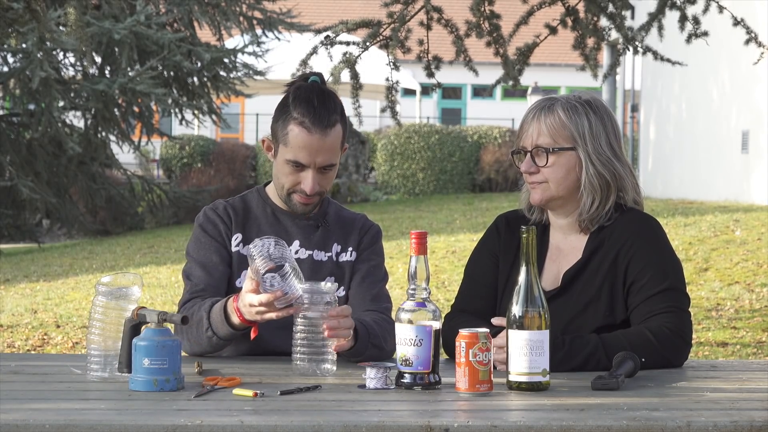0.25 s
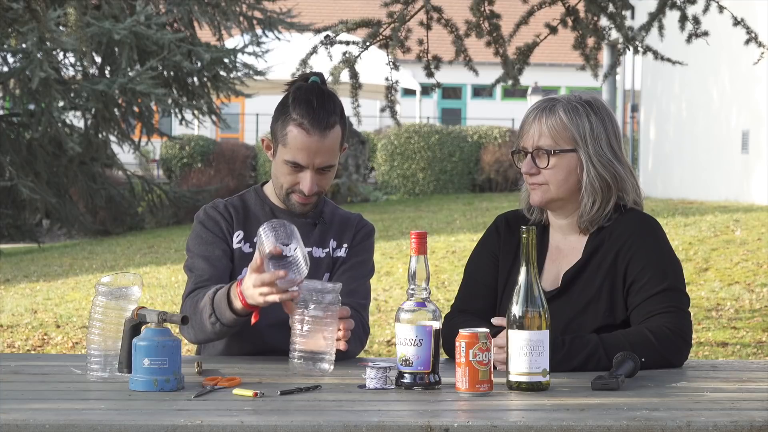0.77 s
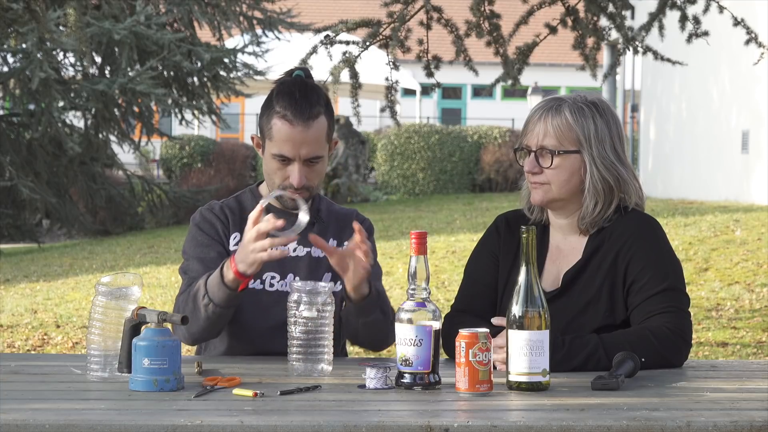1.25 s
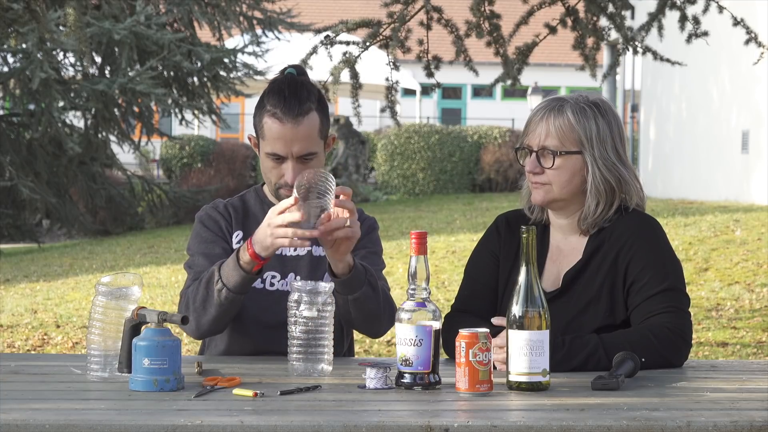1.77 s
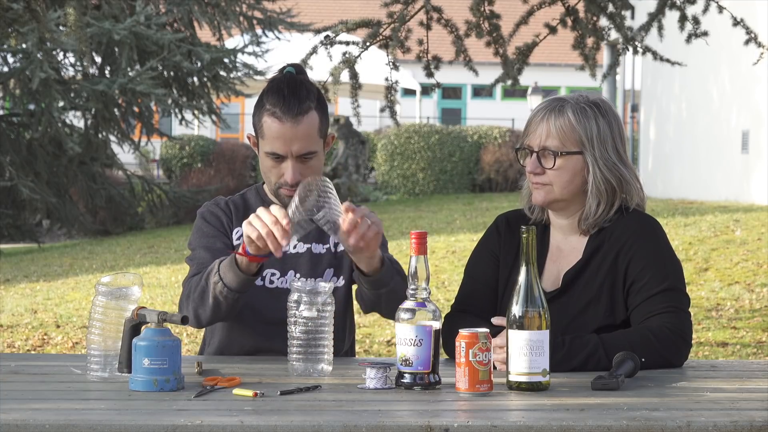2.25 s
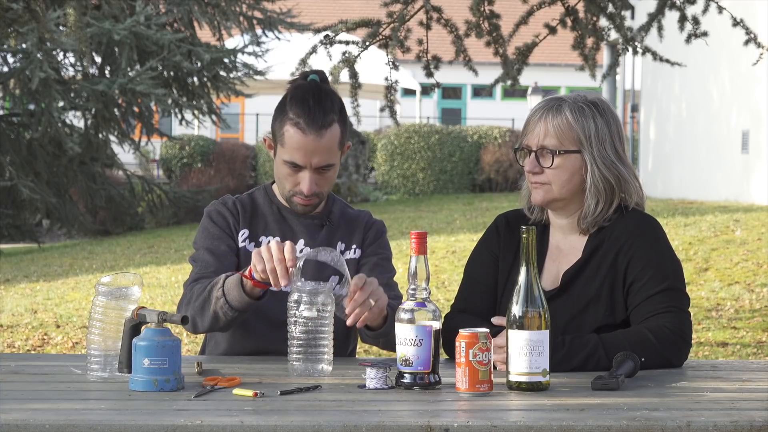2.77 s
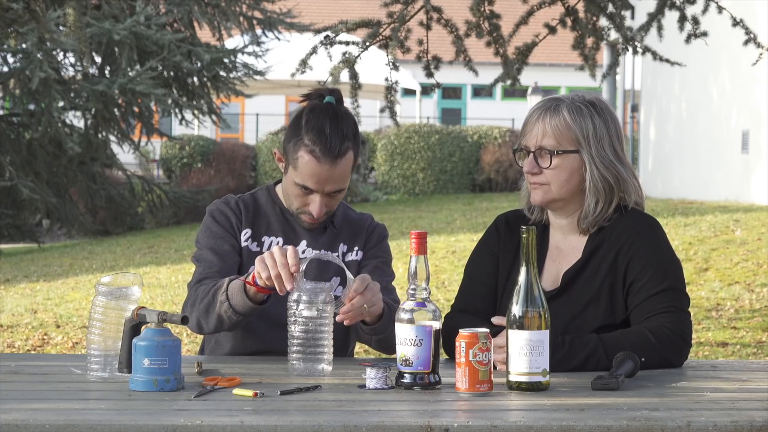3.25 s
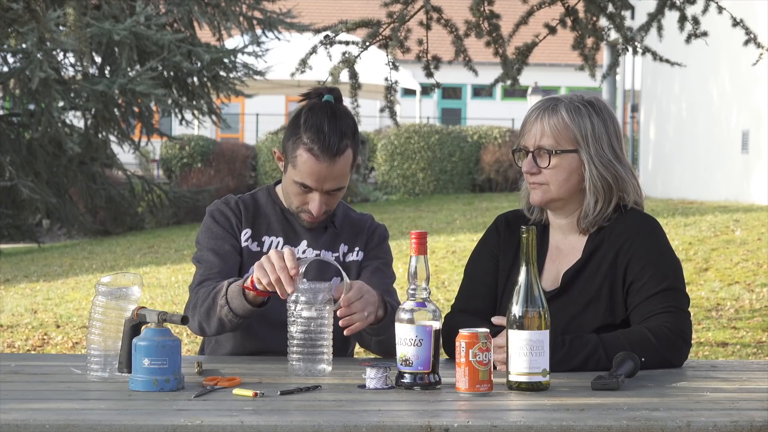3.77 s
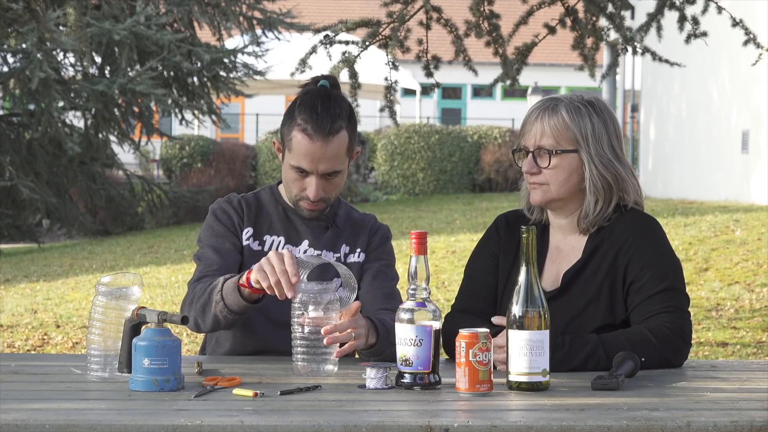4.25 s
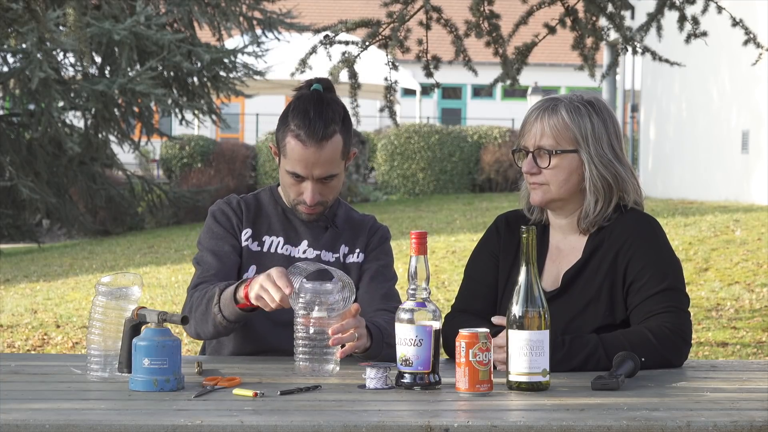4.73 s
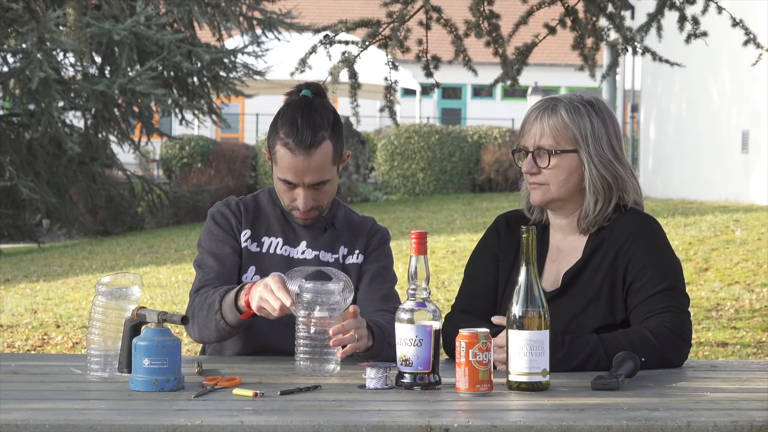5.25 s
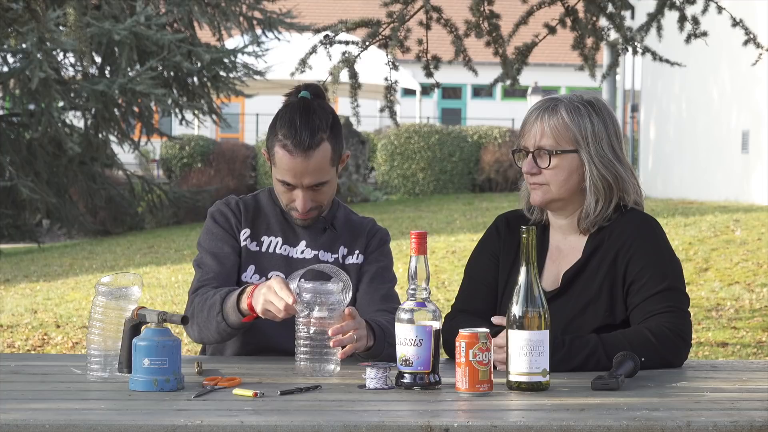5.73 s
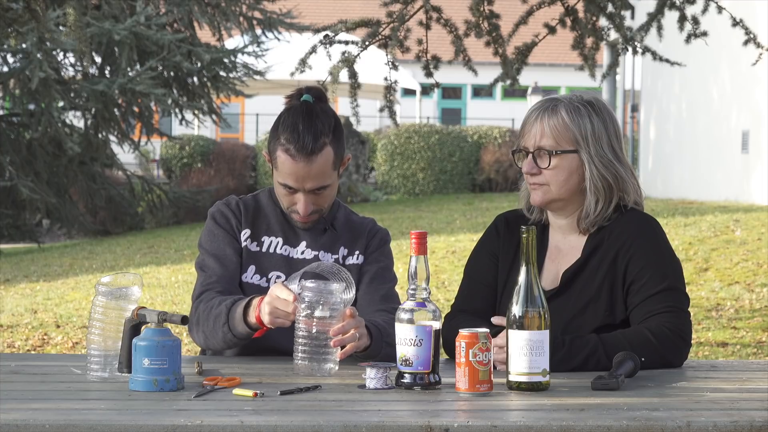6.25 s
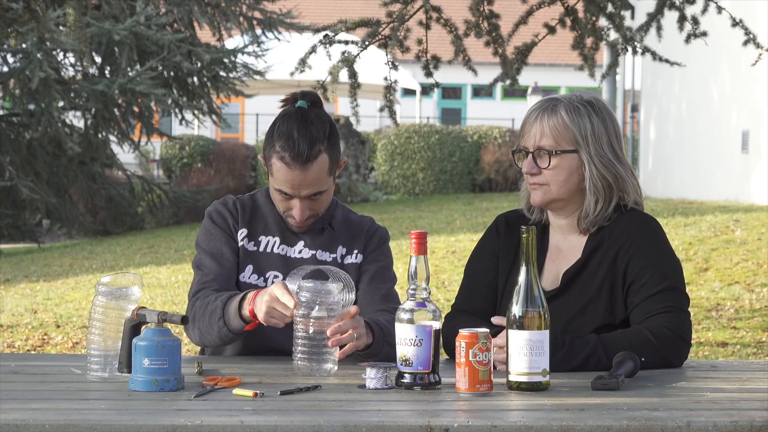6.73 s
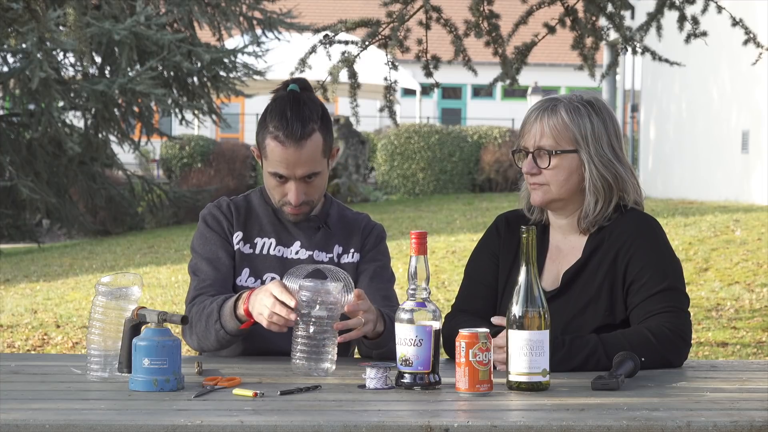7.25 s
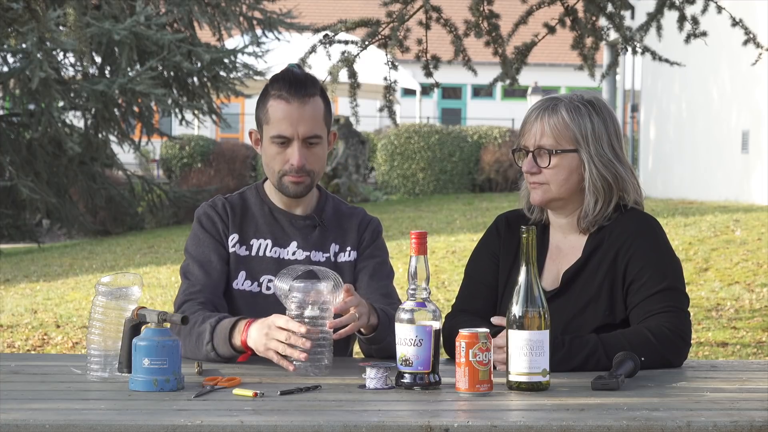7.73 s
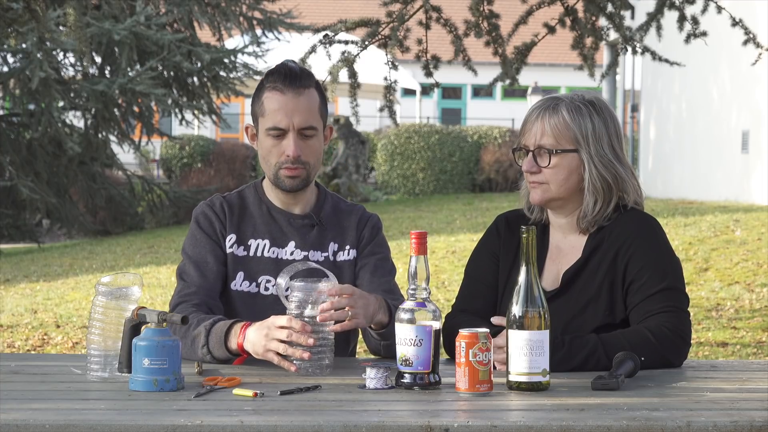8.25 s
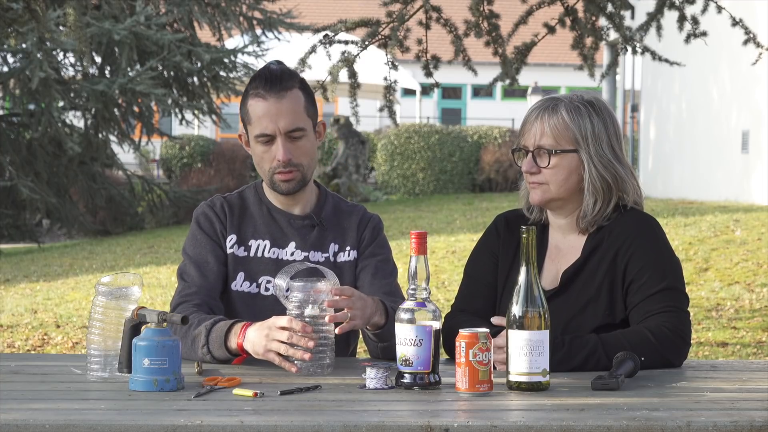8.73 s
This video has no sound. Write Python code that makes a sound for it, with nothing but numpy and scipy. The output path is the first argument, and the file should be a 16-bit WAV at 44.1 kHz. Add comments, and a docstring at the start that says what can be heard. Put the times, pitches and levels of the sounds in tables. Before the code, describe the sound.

Outdoors, a faint wavering low hum and soft, dark open air run throughout, with a very quiet distant engine-like drone rising and sinking in the first six seconds. Close up, thin plastic scrapes and ticks lightly from 0 to 1 s. After a lull, a few thin crackles come at 1.6-2.4 s, with tiny far bird chirps between 1.3 and 2.7 s. From 3 s the buckling thickens: a cluster at 3.4-3.9 s has hollow snaps and a dull small table thud near 3.6 s. Crackling continues from 4.2 s, with sharp, loud pops around 5.1, 5.7, 6.1 and 6.5-6.6 s, short scrapes and gritty edge hiss between them. After 6.9 s it thins to softer clicks, finger scuffs and brief hollow croaks until 7.8 s, with distant chirps at 7.5-8.4 s. Sparse plastic ticks finish, one firmer pop near 8.7 s. Dry, close, scarcely any echo.

```python
"""A faint low hum and the murmur of open air come first, with plastic edges scraping close by.
The cut-off neck of a thin plastic bottle is handled and pressed into the bottle's body, at a table outdoors.
Stick-slip friction makes the scrapes and croaks; buckling strikes the shell's modes in sharp snaps and ticks.
Small birds, gliding sine tones, call far off; reflections and a diffuse tail place the sounds outdoors."""
import sys
import numpy as np
from scipy import signal
from scipy.fft import rfft, irfft, next_fast_len
from scipy.io import wavfile

SR = 44100
rng = np.random.default_rng(int(sys.argv[2]) if len(sys.argv) > 2 else 0)


def bounce(signal):
    """Save signal as a 16-bit WAV file at the path given by the first command-line argument."""
    frames = np.transpose(np.atleast_2d(signal))
    limited = np.clip(frames, -1, 1)
    pcm = np.round(limited * 32767).astype(np.int16)
    wavfile.write(sys.argv[1], SR, pcm)


N = 396459  # length in samples


def from_db(db):
    """Level law: decibels to an amplitude ratio."""
    return 10 ** (np.asarray(db) / 20)


def rms_one(x):
    """Normalisation: scale to unit mean power."""
    return x / np.sqrt(np.mean(x ** 2) + 1e-20)


def in_time(rows):
    """Linear interpolation: each column of a time table at every sample."""
    s, *columns = np.transpose(rows)
    return [np.interp(np.arange(N) / SR, s, column) for column in columns]


def at_hz(points, hz):
    """Logarithmic frequency scale: interpolate a spectral table along it."""
    f, value = np.transpose(points)
    return np.interp(np.log(np.maximum(hz, 1)), np.log(f), value)


def coloured(x, spectrum):
    """Spectral shaping: weight the Fourier components of a noise; unit power."""
    size = next_fast_len(N)
    hz = np.arange(size // 2 + 1) * SR / size
    shaped = irfft(rfft(x, size) * from_db(at_hz(spectrum, hz)), size)
    return rms_one(shaped[:N])


def drift(rate):
    """Random modulation: normal values at a rate per second, joined by straight lines."""
    knots = rng.standard_normal(4000)
    return np.interp(np.arange(N) / SR * rate, np.arange(len(knots)), knots)


def resonate(x, hz, width_hz):
    """Simple resonator: a pole pair, with unit gain at the peak."""
    r = np.exp(-np.pi * width_hz / SR)
    poles = [1, -2 * r * np.cos(2 * np.pi * hz / SR), r * r]
    return signal.lfilter(np.array([1, 0, -1]) * (1 - r * r) / 2, poles, x)


def through(x, resonances):
    """Modal superposition: parallel resonances of alternating sign; unit power."""
    modes = [from_db(db) * resonate(x, hz, width) for hz, width, db in resonances]
    return rms_one(sum((-1) ** k * mode for k, mode in enumerate(modes)))


def add(out, s, sound):
    """Linear superposition: mix a short sound in at time s."""
    i = int(np.clip(round(s * SR), 0, len(out) - 1))
    out[i:i + len(sound)] += sound[:len(out) - i]


# decay of the thin shell: f/Hz, time to fall by 60 dB t/s (a mode may scale it)
SHELL_DECAY = [(200, 0.065), (500, 0.036), (1100, 0.029), (2500, 0.017), (6000, 0.013), (15000, 0.016)]


def ringing(hz, t, longer=1):
    """Damped free vibration: one decaying sine of the shell for each frequency."""
    hz = np.atleast_1d(hz)[:, None]
    return np.sin(2 * np.pi * hz * t) * from_db(-60 * t / (longer * at_hz(SHELL_DECAY, hz)))


STROKE_ATTACK_S, STROKE_SAG_DB_PER_S, STROKE_RELEASE_S = 0.0078, 4.5, 0.011


def stroke(start, length, sag_db_per_s):
    """Amplitude envelope: a movement catches, eases off and lets go; unit gain at mid-length."""
    t = np.maximum(np.arange(N) / SR - start, 0)
    t = t[t < length + .3]
    shape = np.minimum(t / STROKE_ATTACK_S, 1) * np.exp(-np.maximum(t - length, 0) / STROKE_RELEASE_S)
    return np.pad(shape * from_db(-sag_db_per_s * (t - length / 2)), (0, N - len(t)))


# steady hum before its waver: t/s, fundamental amplitude level/dB, octave amplitude level/dB
HUM_LEVELS = [(0, -49, -66), (2.6, -57.5, -63), (4.8, -59.5, -72.5), (5.6, -56, -71), (6.8, -59, -66),
              (7.6, -54.5, -63), (8.6, -49, -65.5), (9, -56, -69)]
HUM_HZ = 66.4
# distant engine before its waver: t/s, f/Hz, amplitude level/dB
ENGINE_COURSE = [(0, 64.6, -68), (1.3, 70, -52), (2.1, 80, -58), (2.6, 68, -49), (3.1, 50, -51.5),
                 (4.2, 50, -65.5), (5.2, 51, -55.5), (5.8, 37, -71)]
# faint whine of the first seconds; its level is that at mid-length
WHINE_HZ, WHINE_DB, WHINE_S = 557, -74, 3


def hum(waver_db=2.1, wander_hz=0.43):
    """Periodic and narrow-band sources: hum with octave, an engine that rises then sinks, a noise whine."""
    low_db, octave_db = in_time(HUM_LEVELS)
    engine_hz, engine_db = in_time(ENGINE_COURSE)
    turn = 2 * np.pi * np.cumsum(HUM_HZ + wander_hz * drift(1.1)) / SR
    steady = from_db(low_db) * np.sin(turn) + from_db(octave_db) * np.sin(2 * turn)
    engine = from_db(engine_db) * np.sin(2 * np.pi * np.cumsum(engine_hz) / SR)
    narrow = resonate(resonate(rng.standard_normal(N), WHINE_HZ, 27), WHINE_HZ, 27)
    whine = from_db(WHINE_DB) * stroke(0, WHINE_S, 1) * rms_one(narrow)
    return whine + (steady + engine) * from_db(waver_db * drift(9.5))


# spectrum of the open air: f/Hz, relative level per Hz/dB
AIR_SPECTRUM = [(20, -9.5), (45, -11), (75, -11), (105, -15), (200, -18.5), (370, -27), (540, -23.5),
                (720, -28.5), (1100, -29.5), (2000, -40.5), (4000, -48.5), (16000, -55)]
AIR_DB = -56.5


def open_air():
    """Stationary broadband noise: the murmur of the open air, mostly low-pitched."""
    return from_db(AIR_DB) * coloured(rng.standard_normal(N), AIR_SPECTRUM)


# plastic sliding on plastic and under fingers:
# start t/s, length t/s, scrape level at mid-length/dB, cut-edge hiss over the scrape level/dB
SLIDING_STROKES = [(0.007, 0.069, -51, -14.5), (0.166, 0.087, -53.5, -14.5), (.3, 0.089, -60.5, -14),
                   (0.44, .3, -56.5, -12), (.77, 0.15, -57.5, -26.5), (0.941, 0.19, -62.5, -23.5),
                   (1.556, .035, -55, -6), (1.679, 0.06, -56, -7), (1.821, 0.1, -57.5, -4),
                   (1.925, 0.18, -65.5, -6), (2.137, 0.17, -62.5, -5), (2.938, .21, -55.5, -11.5),
                   (3.574, 0.1, -53, -17), (3.696, 0.025, -46.5, -14.5), (4.161, 0.066, -53, -14.5),
                   (4.274, 0.074, -53.5, -15), (4.37, 0.38, -59, -18), (4.663, 0.044, -51.5, -13),
                   (5.356, 0.084, -55, -10.5), (6.019, 0.05, -52.5, -16), (6.067, 0.025, -46, -13),
                   (6.278, 0.04, -43.5, -15.5), (6.383, 0.018, -45, -16.5), (6.507, 0.14, -49.5, -10),
                   (6.769, 0.061, -51.5, -12.5), (7.35, 0.034, -47.5, -16.5), (7.612, 0.062, -56.5, -7.5),
                   (7.769, 0.056, -49, -7), (8.079, 0.072, -51.5, -11), (8.828, 0.072, -52.5, -10)]
# friction builds up before each snap, as the neck slides deeper, and dies after it
SLIDE_BUILD_S, SLIDE_DIE_S = 0.0099, 0.017
SLIDE_DB, SLIDE_EDGE_DB = -26.5, -11.5  # scrape against the snap's wall level; hiss against the scrape
SLIDE_LEAD_DB = -7  # build-up against the slide after the snap
# fingers that merely hold the bottle: scrape; hiss against the scrape
HOLD_DB, HOLD_EDGE_DB = -69.5, -11.5


def sliding():
    """Incoherent addition: powers of strokes, slides and hold add; returns scrape dB, hiss over it dB."""
    def fade(x, s):
        # s is the time constant of amplitude, so power fades twice as fast
        return signal.lfilter([1], [1, -np.exp(-2 / (s * SR))], x + 1e-18)

    jolts = np.zeros(N)
    for s, _, wall_db, *_ in BUCKLING_SNAPS:
        add(jolts, s, from_db([wall_db + SLIDE_DB]) ** 2)
    lead = fade(jolts[::-1], SLIDE_BUILD_S)[::-1]
    slide = fade(jolts, SLIDE_DIE_S) + from_db(SLIDE_LEAD_DB) ** 2 * lead
    scrape = slide + from_db(HOLD_DB) ** 2
    hiss = slide * from_db(SLIDE_EDGE_DB) ** 2 + from_db(HOLD_DB + HOLD_EDGE_DB) ** 2
    for start, length, scrape_db, edge_db in SLIDING_STROKES:
        power = (from_db(scrape_db) * stroke(start, length, STROKE_SAG_DB_PER_S)) ** 2
        scrape = scrape + power
        hiss = hiss + power * from_db(edge_db) ** 2
    return 10 * np.log10(scrape), 10 * np.log10(hiss / scrape)


# resonances of the held bottle under a scrape: f/Hz, width f/Hz, relative level/dB
HELD_BOTTLE = [(384, 450, 5), (463, 100, 14), (755, 180, 3.5), (1130, 340, 4), (1610, 340, -2),
               (2530, 420, -8.5)]
# hiss of sliding: f/Hz, relative level per Hz/dB
SLIDING_HISS = [(2000, -16), (3200, 2), (4600, 2), (6200, -3.5), (8500, -9), (12000, -3.5), (16000, -13)]


def rubbing(slips_per_s=330, size_db=4.0, smooth=1.0, uneven_db=4.5):
    """Stick-slip friction: tiny slips over a smooth noise excite the bottle and hiss at the cut edge."""
    scrape, edge = sliding()
    sizes = from_db(size_db * np.minimum(rng.exponential(1, N), 3.5))
    slips = (rng.random(N) < slips_per_s / SR) * sizes
    bursts = signal.lfilter([1], [1, -np.exp(-1200 / SR)], slips + 1e-18)
    # the more the sharp edge catches, the grainier the friction
    gliding = smooth * from_db(np.mean(edge) - edge)
    force = (rms_one(bursts) + gliding) / np.hypot(1, gliding)
    friction = force * rng.standard_normal(N) * from_db(uneven_db * drift(45))
    body = from_db(scrape) * through(friction, HELD_BOTTLE)
    return body + from_db(scrape + edge) * coloured(friction, SLIDING_HISS)


# colour of the thin shell: f/Hz, relative level per Hz/dB
SHELL_COLOUR = [(120, -20), (362, -5), (493, 2), (773, -5), (1120, -6), (1290, -11), (1750, -8), (2340, -7),
                (3050, -13.5), (4880, -12), (11100, -20), (12300, -17.5), (16000, -26.5)]


def tick(db, brightness_db=0, count=90):
    """Impulsive modal excitation: a tiny crease strikes shell modes, tilted by brightness in dB per octave."""
    t = np.arange(int(.025 * SR)) / SR
    hz = np.linspace(np.sqrt(400), np.sqrt(15500), count) ** 2 * rng.uniform(.96, 1.04, count)
    colour = from_db(at_hz(SHELL_COLOUR, hz) + brightness_db * np.log2(hz)) * hz ** (1 / 3)
    ring = (rng.choice([-1, 1], count) * colour) @ ringing(hz, t)
    # the level is the energy spread over five milliseconds
    return np.sqrt(.005 / t[-1]) * from_db(db) * rms_one(ring)


# peak rate; median level over the edge's hiss; spread of level
TICKS_PER_S, TICK_DB, TICK_SPREAD_DB = 220, 0.5, 7


def ticks(fussy=2.3):
    """Random point process: fine crackles crowd in where the cut edge catches hardest."""
    scrape, edge = sliding()
    out = np.zeros(N)
    rate = TICKS_PER_S * from_db(fussy * (edge - edge.max()))
    for i in np.flatnonzero(rng.random(N) < rate / SR):
        spread = TICK_SPREAD_DB * rng.standard_normal()
        add(out, i / SR, tick(scrape[i] + edge[i] + TICK_DB + spread))
    return out


def crease(run_s, follow=0.38, settle_db=-28, settle_s=0.0061, tearing_s=0.0065, count=5):
    """Progressive buckling: a first slip, weaker in a slow fold, then lesser ones; delays s, sizes."""
    running = 2 * run_s * (np.arange(count) + rng.random(count)) / count
    settling = run_s + rng.exponential(settle_s, count)
    sizes = np.repeat([follow, from_db(settle_db)], count) * rng.rayleigh(np.sqrt(.5), 2 * count)
    return np.r_[0, running, settling], np.r_[np.exp(-run_s / tearing_s), sizes]


# buckling wall: t/s, body (180-800 Hz) level/dB, wall (800-3000 Hz) level/dB, crack (above 3000 Hz) level/dB,
# popping panel f/Hz, mean delay of the running slips t/s; snaps() trims the levels and cuts the bass
BUCKLING_SNAPS = [(0.061, -36.5, -51.5, -57.5, 444, 0.0087), (0.1726, -45, -45, -50, 490, 0.00067),
                  (0.3579, -39, -61, -51, 574, 0.00045), (0.3734, -32, -32.5, -35.5, 605, 0.00025),
                  (0.5131, -40, -35, -34.5, 12600, 0.00058), (0.6604, -46, -41, -52, 900, 0.00017),
                  (0.765, -38, -50.5, -71, 730, 0.00032), (0.8842, -38.5, -36, -42, 814, 0.0012),
                  (0.9444, -34, -54, -83, 470, 0.002), (0.996, -37.5, -62, -81, 470, 0.0026),
                  (1.7029, -67, -41, -42.5, 1030, 0.0035), (1.784, -44, -34, -35.5, 960, 0.0047),
                  (1.8841, -65, -33, -39.5, 1066, 0.00099), (2.297, -57, -42.5, -45.5, 1230, 0.0019),
                  (2.3389, -39.5, -36.5, -34.5, 3404, 0.00054), (3.0155, -47, -45, -55, 928, 0.00071),
                  (3.0508, -36, -35, -43, 540, 0.0012), (3.2935, -43, -38, -55, 810, 0.0028),
                  (3.421, -30.5, -35, -39.5, 636, 0.0024), (3.4795, -30, -26, -34, 1100, 0.00077),
                  (3.4882, -29.5, -37.5, -47, 477, 0.0032), (3.5073, -32.5, -30, -44.5, 834, 0.00042),
                  (3.5817, -24, -24.5, -26, 674, 0.0005), (3.8049, -40.5, -34, -41, 2905, 0.00023),
                  (3.889, -22, -22, -30, 922, 0.0022), (4.208, -44.5, -46.5, -51, 897, 0.00093),
                  (4.2529, -56, -43.5, -55, 827, 0.0006), (4.3117, -35.5, -44.5, -61, 610, 0.0044),
                  (4.3316, -38, -52.5, -65, 410, 0.0017), (4.438, -32.5, -41, -58, 463, 0.0018),
                  (4.5554, -39, -35.5, -45.5, 1083, 0.00052), (4.628, -38.5, -33, -40, 847, 0.0012),
                  (4.6856, -43, -40, -48, 1070, 0.0013), (4.7042, -39.5, -28.5, -43, 478, 0.0015),
                  (4.719, -36.5, -23.5, -27.5, 2530, 0.00051), (4.7342, -35, -30, -31.5, 1170, 0.00062),
                  (4.862, -30.5, -27, -34, 797, 0.00052), (4.8796, -28.5, -23, -31, 1095, 0.0011),
                  (5.0628, -35.5, -44.5, -54, 535, 0.0031), (5.0742, -30.5, -32, -39.5, 570, 0.00084),
                  (5.077, -43, -28.5, -28, 1323, 0.00077), (5.0969, -22, -15, -18.5, 1610, 0.001),
                  (5.1161, -29.5, -35, -46, 523, 0.0034), (5.3962, -34, -33, -44.5, 1130, 0.0056),
                  (5.4207, -45, -35, -36, 2190, 0.00031), (5.491, -45, -37, -41.5, 2170, 0.0011),
                  (5.658, -44.5, -43, -56.5, 920, 0.00049), (5.6739, -46, -38.5, -50, 897, 0.0034),
                  (5.6887, -27, -18.5, -24.5, 2080, 0.00054), (5.702, -28, -15.5, -24.5, 1740, 0.00011),
                  (5.739, -35.5, -34.5, -40.5, 743, 0.0038), (5.7654, -38, -36.5, -44, 2100, 0.00069),
                  (6.0997, -33.5, -12, -23, 1130, 0.00095), (6.1326, -34, -28, -33.5, 1090, 0.00012),
                  (6.147, -31.5, -38.5, -58, 630, 0.0011), (6.2474, -40, -44.5, -45.5, 535, 0.00086),
                  (6.2785, -36, -46, -52.5, 700, 0.0025), (6.361, -46, -44, -42.5, 610, 0.00093),
                  (6.4108, -36, -42.5, -57.5, 665, 0.0017), (6.4599, -36, -38.5, -42.5, 1070, 0.0013),
                  (6.497, -28.5, -20, -19, 1130, 0.0002), (6.5338, -36, -40, -53, 1170, 0.002),
                  (6.563, -32.5, -34, -49, 1150, 0.0017), (6.5735, -36.5, -36.5, -50, 1150, 0.0018),
                  (6.589, -25, -16.5, -21.5, 1810, 0.0016), (6.6105, -40.5, -37.5, -50, 1200, 0.0044),
                  (6.7347, -40, -39.5, -57.5, 1150, 0.00021), (6.7865, -33.5, -34.5, -35.5, 470, 0.00055),
                  (6.8885, -32, -24, -39, 1945, 0.00054), (6.9564, -47, -37.5, -43.5, 1120, 0.00095),
                  (7.151, -47, -53.5, -61.5, 372, 0.00077), (7.3528, -51, -43, -39.5, 2010, 0.00063),
                  (7.3608, -37.5, -40, -41, 1100, 0.00074), (7.3694, -41, -39.5, -43, 470, 0.00017),
                  (7.4206, -39, -39.5, -45.5, 530, 0.0012), (7.429, -36.5, -42.5, -42, 585, 0.0018),
                  (7.841, -46, -42.5, -43, 1070, 0.00025), (8.096, -43.5, -40, -38.5, 4400, 0.0035),
                  (8.138, -60, -39.5, -42.5, 1464, 0.0023), (8.2212, -30, -39, -42, 510, 0.0027),
                  (8.695, -25, -29, -30.5, 667, 0.00039), (8.833, -44, -46, -34, 5500, 0.00077),
                  (8.8588, -44, -47.5, -45, 592, 0.0019), (8.93, -41.5, -58, -69, 397, 0.0012)]


def snaps(panel_db=-2.5, panel_rings=0.82, wall_db=-1.0, crack_db=-1.0, rise_cycles=0.16,
          lowest_hz=165, softer_db=1.0, count=360):
    """Snap-through buckling: every slip strikes dense shell modes anew, and the popping panel rings out."""
    t = np.arange(int(.07 * SR)) / SR
    hz = np.linspace(np.sqrt(130), np.sqrt(16500), count) ** 2
    edges = [800, 3000]  # Hz, between body, wall and crack

    def swell(f):
        # bending waves travel slower at low pitch, so low modes swell later than the crack
        return 1 - np.exp(-t * f / rise_cycles)

    # the fourth root makes up for modes spaced wider at high pitch
    strengths = from_db(at_hz(SHELL_COLOUR, hz)) * hz ** (1 / 4)
    modes = ringing(hz, t) * swell(hz[:, None]) * strengths[:, None]
    families = np.split(modes, np.searchsorted(hz, edges))
    # a snap's level is its energy spread over five milliseconds
    brief = np.sqrt(.005 / t[-1])
    out = np.zeros(N)
    for s, body, wall, crack, panel_hz, run_s in BUCKLING_SNAPS:
        delays, sizes = crease(run_s)
        for k, level_db in enumerate((body, wall + wall_db, crack + crack_db)):
            strikes = rng.standard_normal((len(sizes), len(families[k]))) @ families[k]
            ring = np.zeros(len(t))
            # the later slips are softer, and so duller than the first
            dulled = sizes * from_db(-softer_db * k * (delays > 0))
            for delay, size, strike in zip(delays, dulled, strikes):
                add(ring, delay, size * rms_one(strike))
            if k == np.digitize(panel_hz, edges):
                panel = rms_one(ringing(panel_hz, t, panel_rings)[0] * swell(panel_hz))
                # the panel moves with the shell around it, never against it
                ring = rms_one(ring) + np.copysign(from_db(panel_db), ring @ panel) * panel
            add(out, s, brief * from_db(level_db) * rms_one(ring))
    # so small a wall radiates little bass
    return signal.sosfilt(signal.butter(2, lowest_hz, "high", fs=SR, output="sos"), out)


# light strokes on the wall, the loose neck or the cut edge:
# start t/s, length t/s, resonance f/Hz, width f/Hz, median level/dB
SINGING_STROKES = [(0.15, 0.71, 2120, 700, -71), (0.38, 0.11, 11700, 3000, -64.5),
                   (1.716, 0.61, 1095, 220, -62), (1.878, 0.084, 12300, 4000, -60)]


def singing(uneven_db=6.5):
    """Friction-driven resonance: uneven rubbing noise keeps a single resonance going."""
    out = np.zeros(N)
    for start, length, hz, width, db in SINGING_STROKES:
        tone = rms_one(resonate(rng.standard_normal(N), hz, width))
        out += from_db(db + uneven_db * drift(45)) * stroke(start, length, 0) * tone
    return out


# single creases too light to pop a panel: t/s, level/dB, brightness/dB per octave
LIGHT_CREASES = [(0.237, -45.5, -1.5), (0.301, -42, 4), (0.4665, -38.5, 1.5), (0.478, -39, 2.5),
                 (.5, -43, 16), (.874, -43, -6), (1.454, -47, 2), (1.583, -52, 4.5), (2.0907, -44, 13),
                 (2.167, -53.5, 0.5), (2.248, -51.5, 2.5), (3.127, -42.5, 0), (3.2855, -44.5, -1.5),
                 (3.66, -53, 1), (4.266, -43.5, -3.5), (4.748, -41.5, -2.5), (4.961, -52, 0.5),
                 (5.147, -41.5, -2.5), (6.396, -41, -3.5), (6.928, -51, 0), (8.151, -42, -0.5),
                 (8.244, -42, -3.5), (8.506, -48.5, 3.5), (8.6388, -43.5, 0), (8.667, -45, -1),
                 (8.735, -46, 9), (8.745, -47.5, 5)]


def crinkles():
    """Stress relaxation: the strained wall gives way in separate light ticks."""
    out = np.zeros(N)
    for s, db, brightness_db in LIGHT_CREASES:
        add(out, s, tick(db, brightness_db))
    return out


# bird notes: start t/s, length t/s, first f/Hz, middle f/Hz, last f/Hz, level at mid-note/dB
BIRD_NOTES = [(1.351, 0.09, 4760, 4210, 4300, -64.5), (1.502, 0.033, 5340, 5200, 5340, -67.5),
              (1.647, 0.041, 7160, 7360, 7100, -64.5), (1.766, 0.06, 3730, 4110, 4200, -62),
              (2.507, 0.095, 6200, 7920, 6500, -67.5), (2.67, 0.038, 5800, 7030, 7160, -68.5),
              (2.704, 0.033, 7100, 7400, 6260, -62.5), (7.519, 0.06, 7400, 7400, 7300, -71),
              (7.645, 0.054, 3950, 4210, 4090, -53), (7.91, 0.031, 8250, 7520, 7640, -70.5),
              (8.034, 0.055, 4360, 4110, 4100, -54.5), (8.168, 0.11, 5150, 5230, 5050, -70),
              (8.338, 0.048, 8400, 7180, 7000, -64.5)]


def birds(waver=0.0046):
    """Frequency modulation: whistles slide quickly onto their middle pitch, hold it and slide off."""
    out = np.zeros(N)
    wobble = 1 + waver * drift(220)
    for s, length, first_hz, middle_hz, last_hz, db in BIRD_NOTES:
        u = np.linspace(-1, 1, int(length * SR))
        end_hz = np.where(u < 0, first_hz, last_hz)
        hz = middle_hz + (end_hz - middle_hz) * np.abs(u) ** 4
        phase = 2 * np.pi * np.cumsum(hz * wobble[int(s * SR):][:len(u)]) / SR
        add(out, s, from_db(db) * np.sqrt(2 * (1 - u * u)) * np.sin(phase))
    return out


# the foot of the bottle bumps the table; the level is the starting amplitude
BUMP_S, BUMP_HZ, BUMP_DB = 3.582, 153, -32.5


def bump():
    """Damped impact response: a dull, short thud of the table top."""
    out = np.zeros(N)
    add(out, BUMP_S, from_db(BUMP_DB) * ringing(BUMP_HZ, np.arange(SR) / SR, 1.26)[0])
    return out


# fingers dragging on the hollow body: middle t/s, half length t/s (Gaussian), peak scuff level/dB, croak f/Hz
FINGER_GRIPS = [(7.082, 0.012, -55, 711), (7.216, 0.008, -51, 781), (7.251, .006, -54.5, 1190),
                (7.547, 0.015, -53, 587), (7.603, 0.0034, -53.5, 493), (7.65, 0.009, -47.5, 271),
                (7.664, 0.01, -46, 720), (7.808, 0.0067, -44, 846)]
# the gripped body and the scuff of the skin: f/Hz, width f/Hz, relative level/dB
GRIPPED_BODY = [(470, 150, 7), (1100, 1200, -8), (2480, 400, -9), (5370, 1460, -15.5)]


def grips(slips_per_s=650, croak_db=4.0, waver=0.0994):
    """Stick-slip of skin: the hollow body scuffs and croaks briefly, at a pitch set by where it is held."""
    t = np.arange(N) / SR
    slips = rms_one((rng.random(N) < slips_per_s / SR) * rng.choice([-1., 1.], N))
    scuff = through(slips + .5 * rng.standard_normal(N), GRIPPED_BODY)
    bent_time = np.cumsum(1 + waver * drift(slips_per_s / 2)) / SR
    out = np.zeros(N)
    for s, half, db, hz in FINGER_GRIPS:
        croak = from_db(croak_db) * np.sin(2 * np.pi * hz * bent_time)
        out += from_db(db) * np.exp(-.5 * ((t - s) / half) ** 2) * (scuff + croak)
    return out


def dulled_above(x, hz):
    """Treble absorption: a first-order low-pass."""
    return signal.sosfilt(signal.butter(1, hz, fs=SR, output="sos"), x)


# reflections from table, house and garden: delay t/s, level against the dulled direct sound/dB
REFLECTIONS = [(.0034, -32), (.022, -33)]


def echoes(x, dull_hz=4500):
    """Specular reflection: delayed, duller copies from hard surfaces."""
    out, dull = np.zeros(N), dulled_above(x, dull_hz)
    for delay, db in REFLECTIONS:
        add(out, delay, from_db(db) * dull)
    return out


def garden(x, wet_db, t60, dull_hz):
    """Diffuse scattering: trees and walls return a soft, dull tail, as convolution with decaying noise."""
    t = np.arange(SR) / SR
    tail = rng.standard_normal(SR) * from_db(-60 * t / t60) * (1 - np.exp(-t / 0.013))
    tail = dulled_above(tail, dull_hz)
    return from_db(wet_db) * signal.fftconvolve(x, tail / np.linalg.norm(tail))[:N]


def scene():
    """Superposition of sources: the bottle close by, birds and hum far away."""
    background = hum() + open_air()
    bottle = rubbing() + ticks() + snaps() + singing() + crinkles() + bump() + grips()
    song = birds()
    near = bottle + echoes(bottle) + garden(bottle, wet_db=-37.0, t60=0.42, dull_hz=9000)
    far = song + garden(song, wet_db=-9.0, t60=0.36, dull_hz=8970) + background
    return (near + far)[None, :]


def record(dry):
    """Band limitation: a steep elliptic low-pass cuts the top above 16.1 kHz."""
    return signal.sosfilt(signal.ellip(10, .1, 80, 16100, fs=SR, output="sos"), dry)


dry = scene()
out = record(dry)
bounce(out)
```